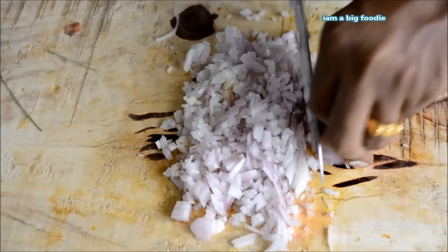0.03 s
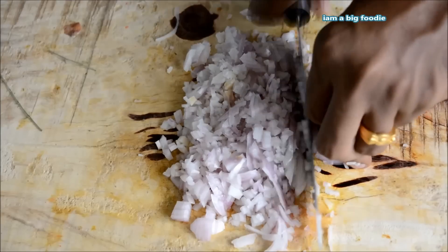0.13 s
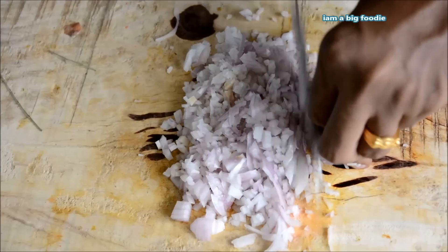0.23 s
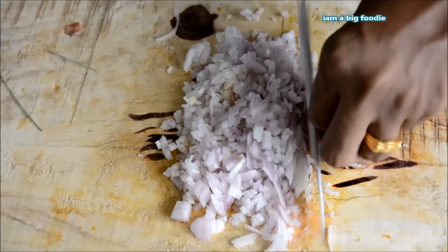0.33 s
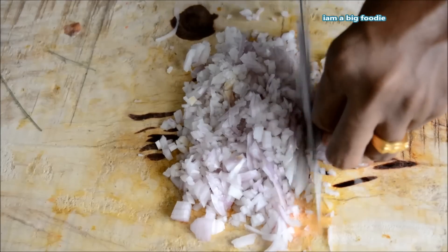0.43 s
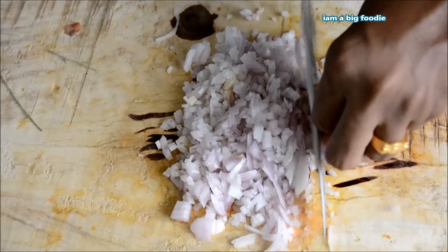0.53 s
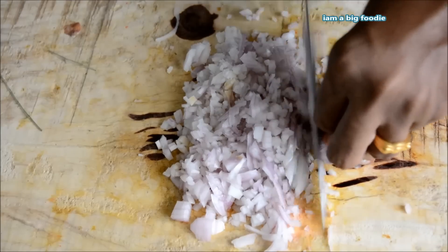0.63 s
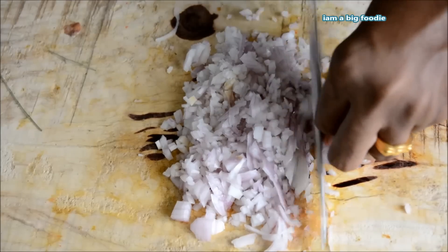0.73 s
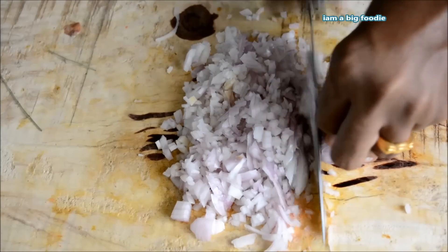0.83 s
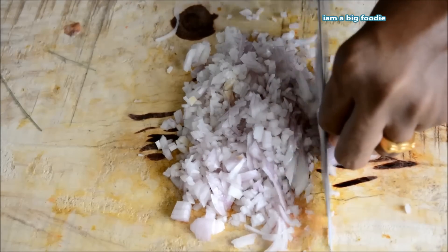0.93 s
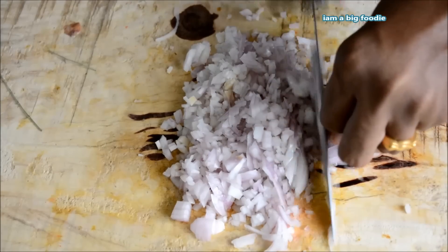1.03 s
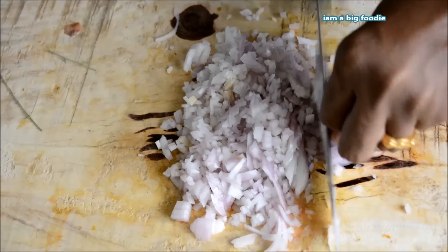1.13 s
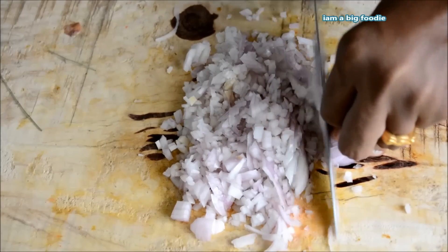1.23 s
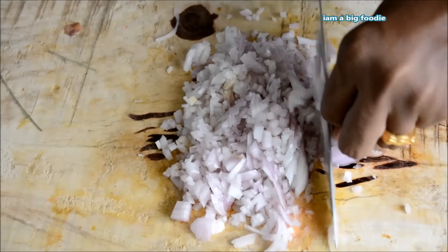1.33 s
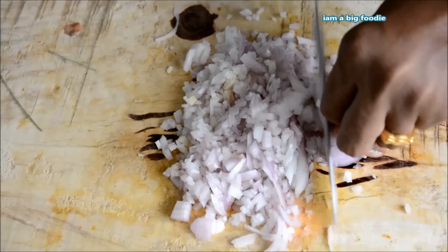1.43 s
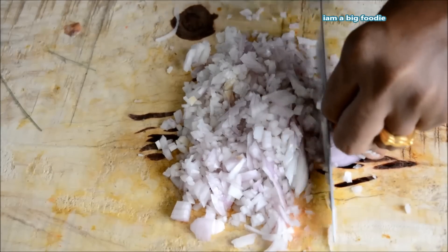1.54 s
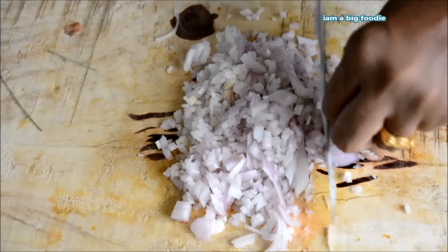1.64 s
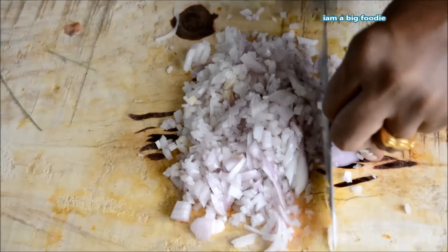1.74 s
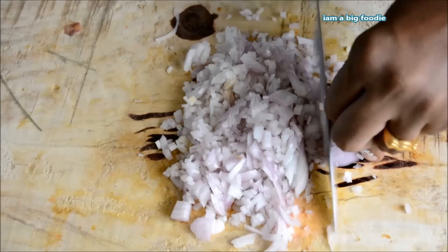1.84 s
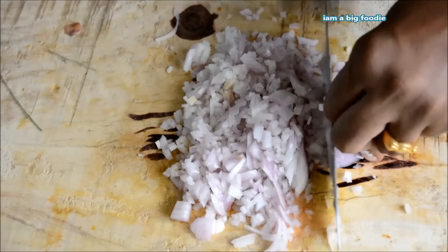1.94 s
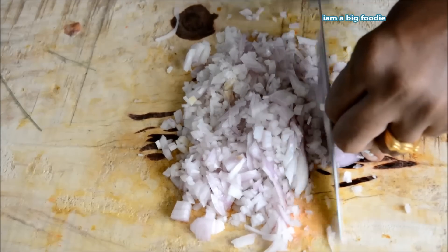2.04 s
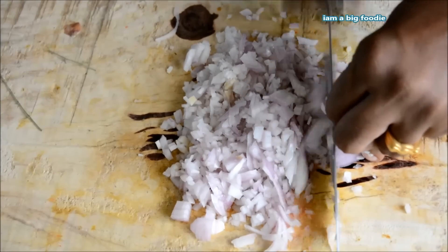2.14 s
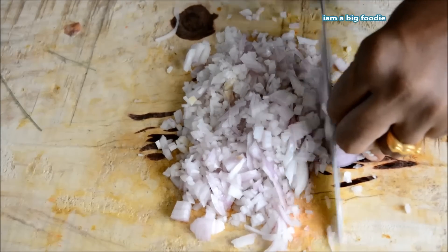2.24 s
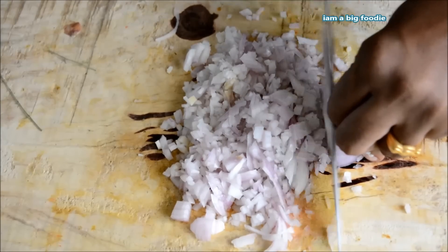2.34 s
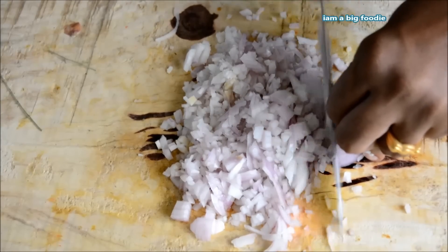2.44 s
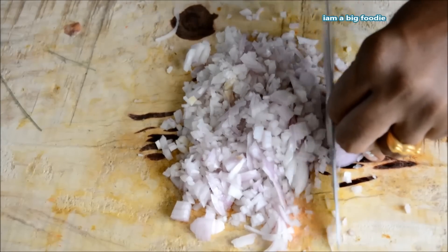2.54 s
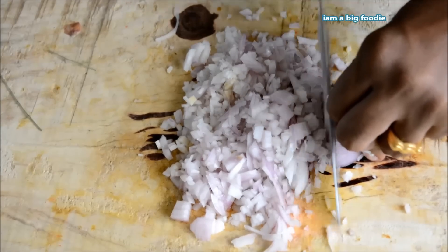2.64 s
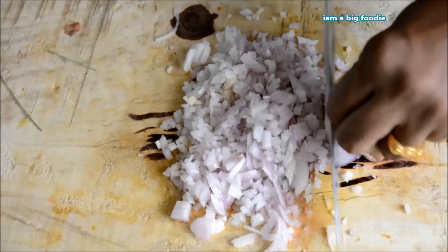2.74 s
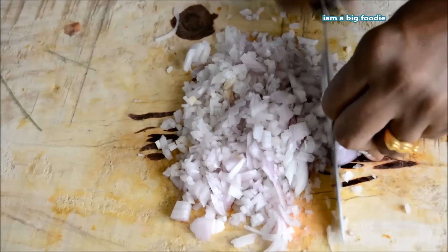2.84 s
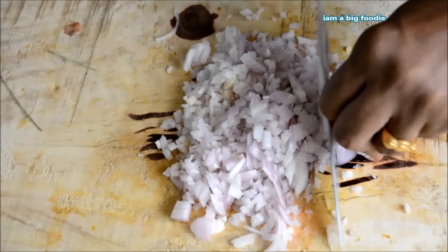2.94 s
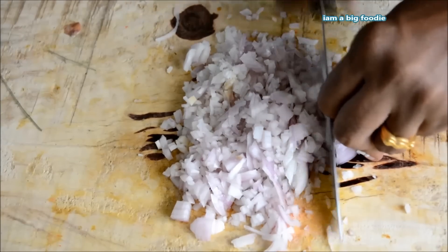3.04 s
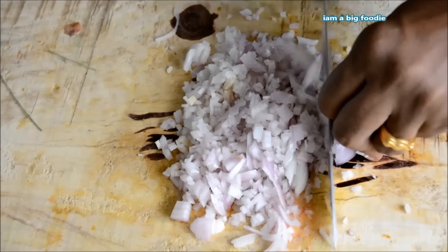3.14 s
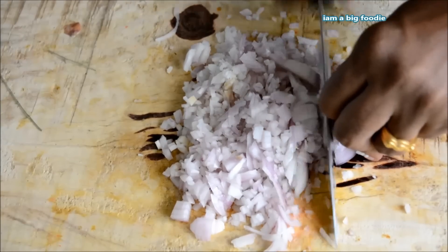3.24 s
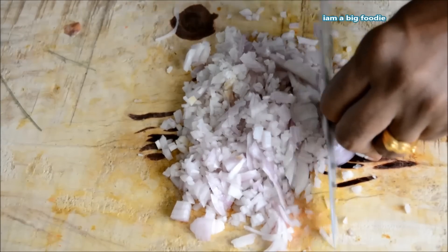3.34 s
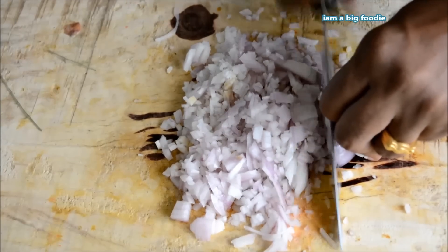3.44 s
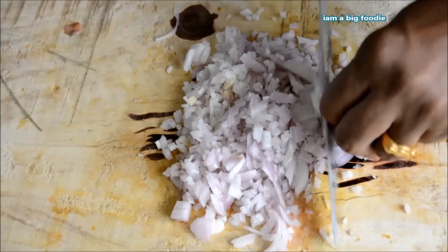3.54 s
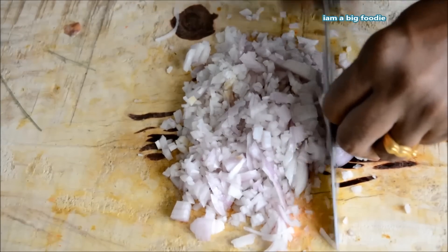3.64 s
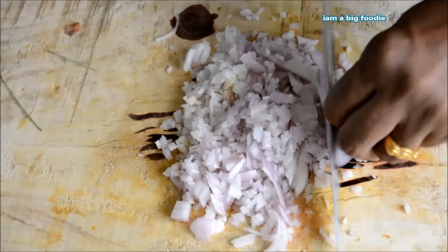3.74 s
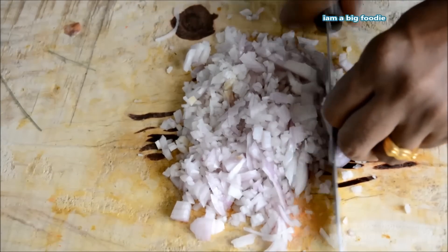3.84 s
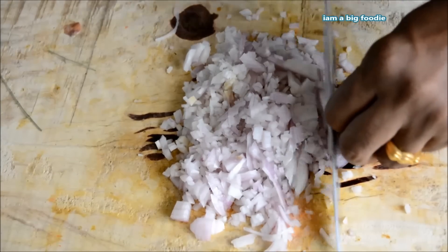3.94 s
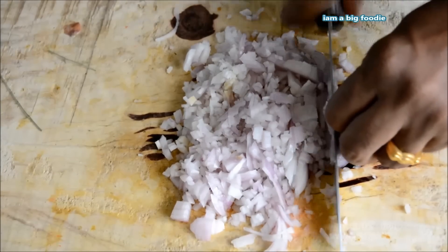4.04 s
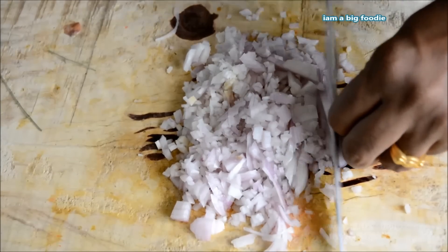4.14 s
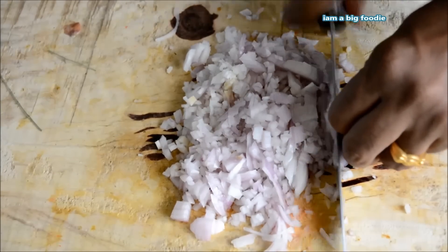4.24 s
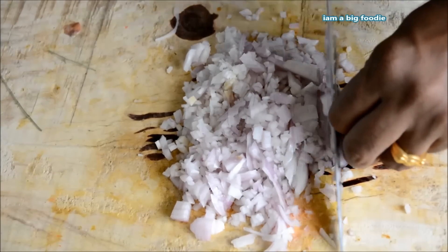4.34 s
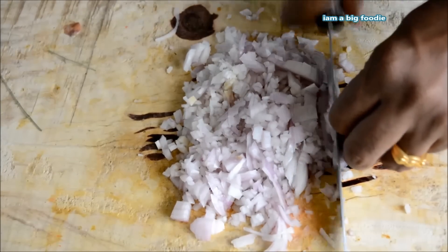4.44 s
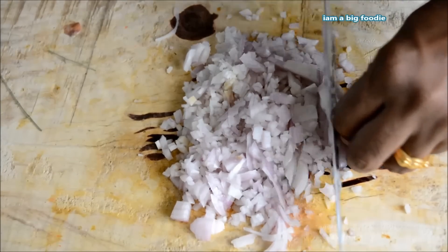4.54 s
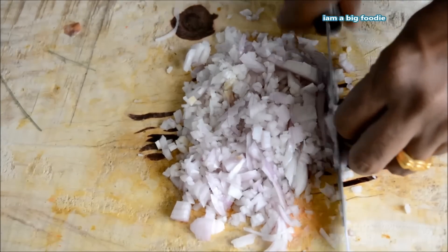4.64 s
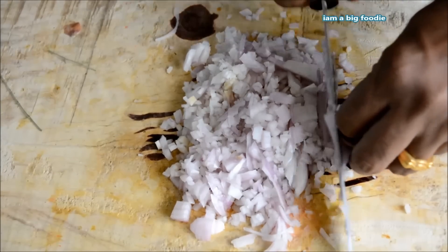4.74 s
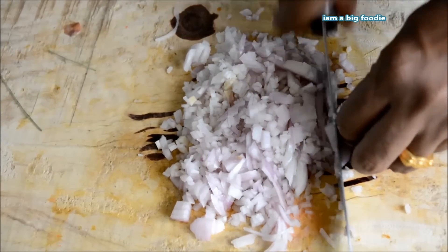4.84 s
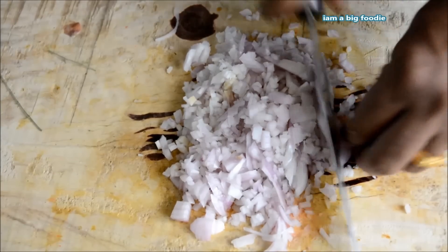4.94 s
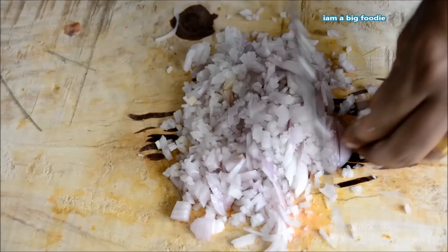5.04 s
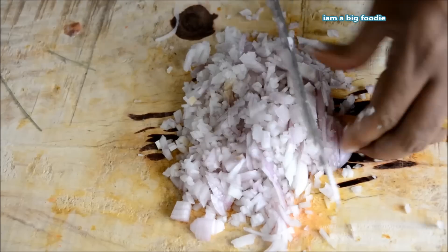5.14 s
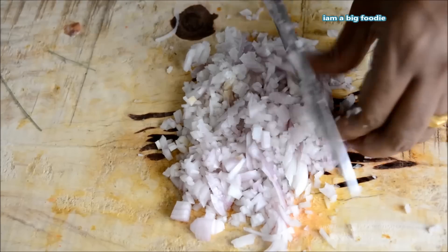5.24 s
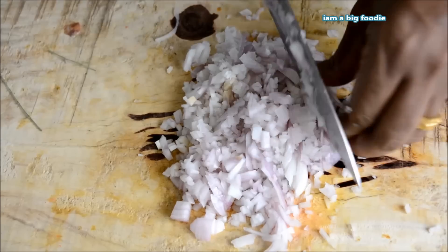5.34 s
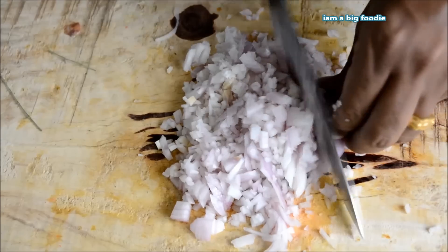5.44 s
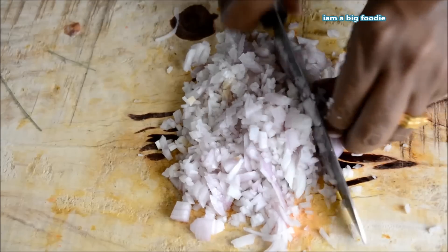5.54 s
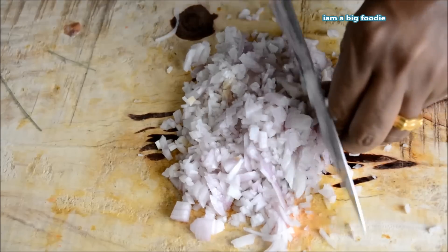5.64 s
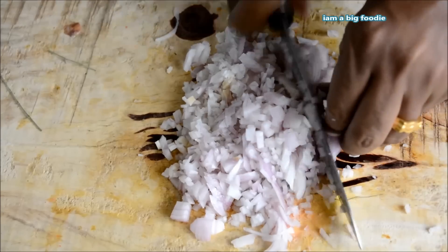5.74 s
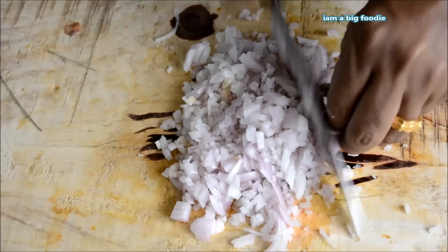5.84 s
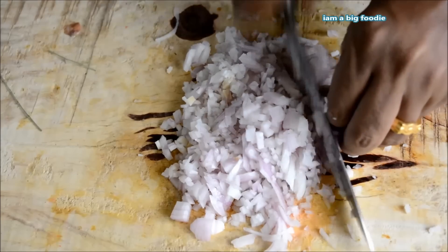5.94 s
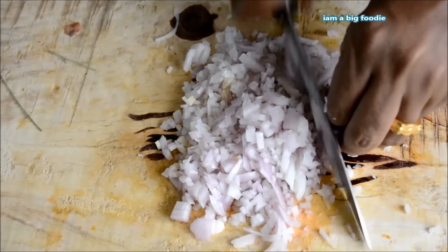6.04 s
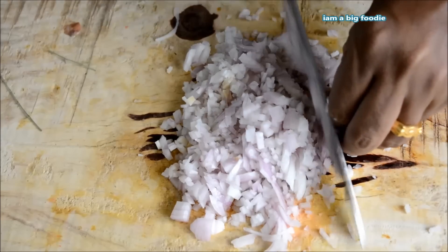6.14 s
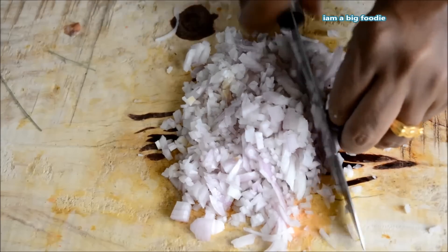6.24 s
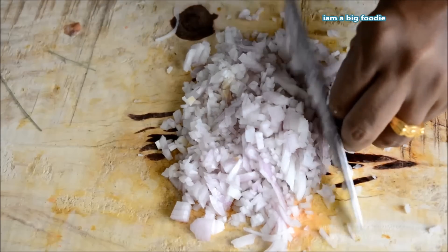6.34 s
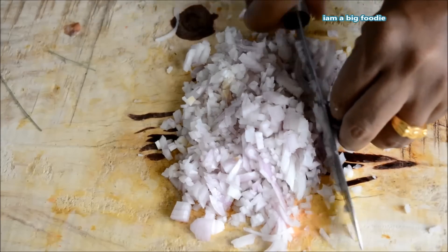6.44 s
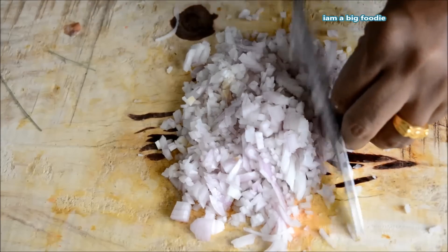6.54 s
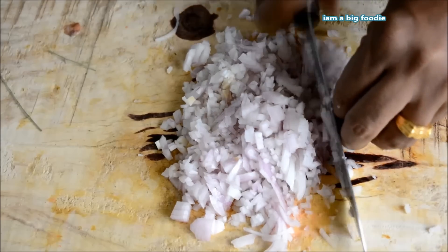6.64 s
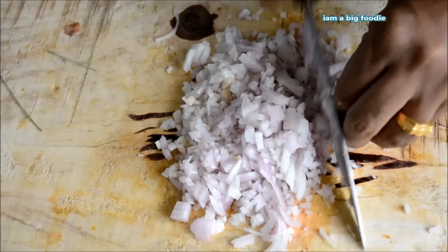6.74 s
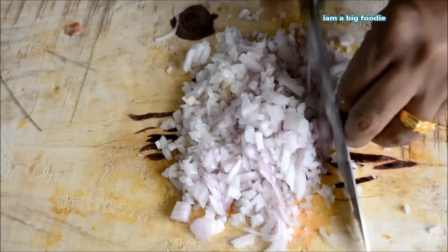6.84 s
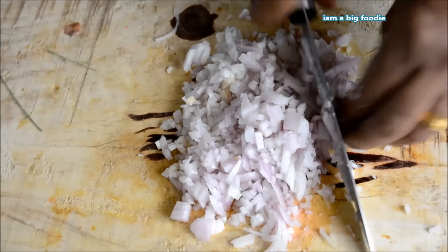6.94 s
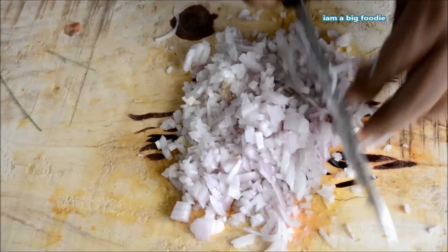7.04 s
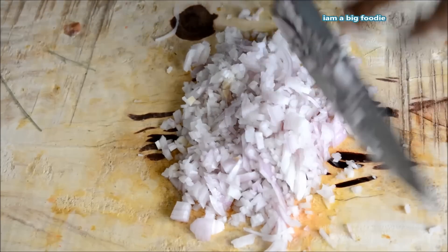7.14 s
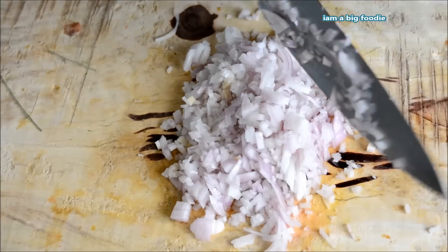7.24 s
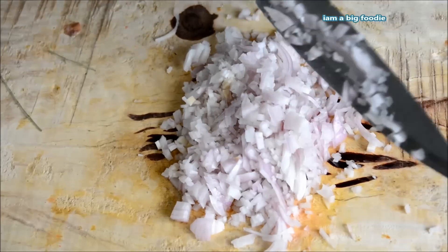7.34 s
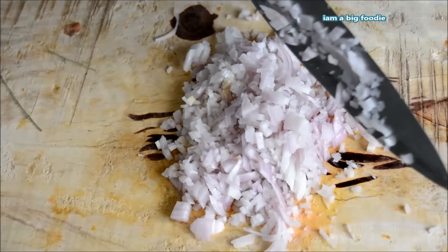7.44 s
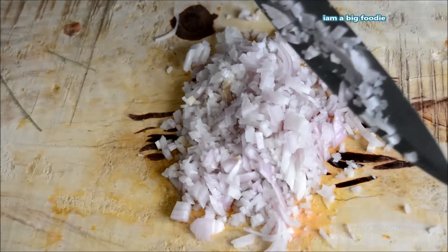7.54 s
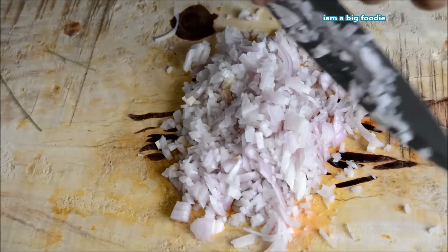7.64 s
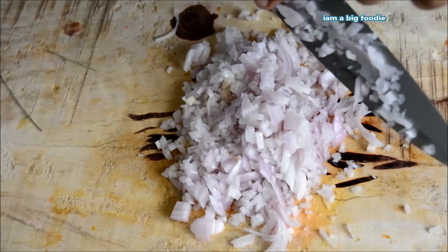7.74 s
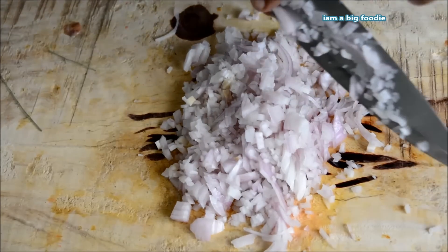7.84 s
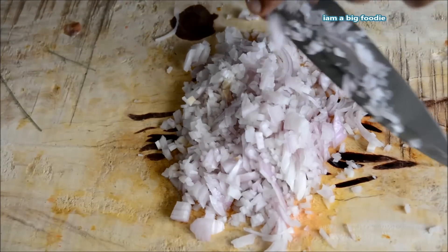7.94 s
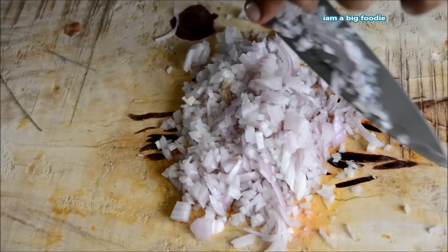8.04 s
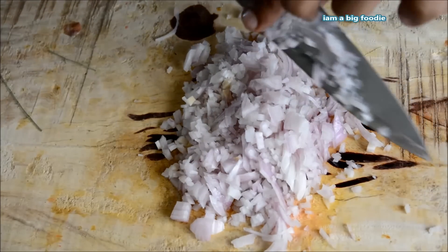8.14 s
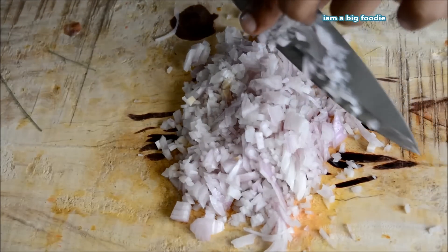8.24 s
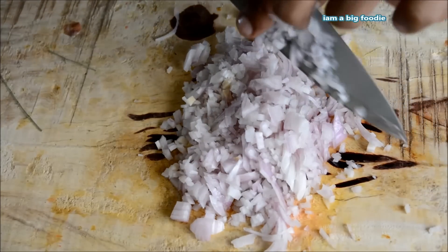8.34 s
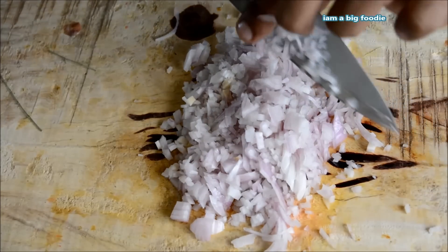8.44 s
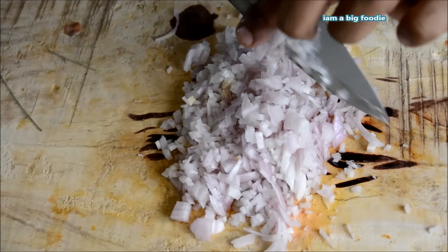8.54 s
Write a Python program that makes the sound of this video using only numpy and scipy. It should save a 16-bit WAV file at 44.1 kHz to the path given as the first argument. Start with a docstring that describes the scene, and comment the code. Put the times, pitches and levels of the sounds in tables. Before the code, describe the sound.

A large kitchen knife rapidly dices an onion on a wooden board, wet crunches and woody knocks in a long run, a pause, then a shorter run.

```python
"""A wet crunch and a woody knock come first: a large kitchen knife dices an onion on a board, close to the microphone.
About five strokes a second make a long run, a pause and a short run; then the knife is shifted quietly.
Crunch is a dense train of random cell bursts; each knock sums decaying modes of board and blade with noise.
Filtered noise shakes the table's low modes, a hard-walled kitchen echoes the knife,
and faint air noise, sine hums, a thin whine and a late rumble lie beneath."""
import sys
import numpy as np
from scipy import signal
from scipy.fft import rfft, irfft, next_fast_len
from scipy.io import wavfile

SR = 44100
rng = np.random.default_rng(int(sys.argv[2]) if len(sys.argv) > 2 else 0)


def output_pcm(signal):
    """Save a mono or channel-first signal as 16-bit PCM at the path in sys.argv[1].

    Samples are clipped to [-1, 1] before scaling.
    """
    pcm = np.clip(np.atleast_2d(signal).T, -1, 1) * 32767
    wavfile.write(sys.argv[1], SR, np.round(pcm).astype(np.int16))


N = 378364
TIME = np.arange(N) / SR

# Knife strokes; the last stops in the onion. The lead is how long before landing the edge enters the onion;
# wood and ring levels are relative to the knock, knock and crunch levels precede filtering:
# land_s, knock_db, hollow_wood_db, blade_ring_db, lead_s, crunch_db
STROKES = [(0.129, -20.5, -0.5, -3, 0.023, -59), (0.3848, -15, 3.5, 1, .038, -52.5),
           (0.602, -18, 4, 2.5, 0.038, -50.5), (0.7961, -15.5, 5, 5, 0.034, -49),
           (1.0019, -21.5, 14.5, -2, 0.053, -47), (1.204, -24, 12, 2, .053, -47.5),
           (1.3504, -17.5, -3, -1, 0.00067, -60.5), (1.5505, -13, -2, -2, 0.002, -70.5),
           (1.7632, -9, 0, 0.5, 0.039, -54), (1.9815, -14, 3.5, -2, 0.041, -50.5),
           (2.1927, -17, 4, -3.5, 0.049, -49.5), (2.373, -9, -1.5, -5, 0.036, -54),
           (2.5734, -9.5, -2, -7.5, .028, -55), (2.8022, -12.5, 2.5, 2.5, 0.042, -47),
           (3.0012, -12.5, -3, -0.5, .032, -54.5), (3.1875, -9.5, -1, -1.5, 0.044, -64.5),
           (3.4121, -13.5, 2, 7, 0.046, -47.5), (3.611, -11.5, 0, 3, 0.049, -55),
           (3.8104, -18.5, 1.5, 3.5, 0.033, -47.5), (4.0103, -18, -1, 6, 0.03, -50.5),
           (4.22, -15, 0.5, 5.5, .033, -51.5), (4.4216, -16.5, -2, 1.5, .028, -50.5),
           (4.6265, -11.5, -1, 5.5, 0.0075, -50), (4.8089, -20, -1, 9.5, 0.0017, -50.5),
           (5.4864, -17, -0.5, -2.5, 0.03, -56), (5.7435, -19.5, 0.5, 0, 0.03, -53.5),
           (5.966, -16, -1, 3.5, 0.018, -49), (6.2096, -22.5, 3, 4, 0.02, -49.5),
           (6.4221, -22.5, 2, 3, 0.0057, -52), (6.6486, -17, -3, -1, 0.0013, -48),
           (6.889, -54, -7, 0, .044, -53)]
# Snaps of firm onion layers, before filtering: start_s, level_db
LAYER_SNAPS = [(0.182, -37.5), (0.405, -26.5), (0.51, -50.5), (0.984, -37), (3.816, -35.5), (5.742, -25.5),
               (5.963, -31.5)]
# Light touches while the knife is shifted: start_s, level_db
LIGHT_TOUCHES = [(7.385, -81), (7.425, -79), (7.945, -82), (8.40, -77)]

# Modes of the wooden board: pitch_hz, level_db, t60_s
BOARD_MODES = [(626.6, -16, 0.03), (830, -3.5, 0.027), (1052, -6, 0.034), (1156.3, -5.5, 0.05),
               (1227.4, -15.5, 0.18), (1275, -8.5, 0.1), (1403, 6, 0.052), (1402, -17, 0.06),
               (1487, -16.5, 0.12), (1662, -4, 0.05), (1753, -10, 0.1), (1890, 6.5, 0.0051),
               (2012, -17.5, 0.22), (2137, -15, 0.011)]
# Modes of the steel blade: pitch_hz, level_db, t60_s
BLADE_MODES = [(2619, -8.5, 0.043), (3020, -5.5, 0.011), (3540, -18, 0.015), (4450, -18, 0.014),
               (4998, -29.5, 0.019), (6160, -38, .04)]
# Low modes of the table: pitch_hz, level_db, t60_s
TABLE_MODES = [(57.7, -27.5, .1), (105.5, -5.5, 0.56), (125, -5.5, 0.16), (276.1, -4, 0.071),
               (405.3, -3.5, 0.082)]

# Spectrum of the edge's noise on the board: frequency_hz, gain_db
CRACK_SPECTRUM = [(100, -12), (400, 9), (1500, 15), (3200, 10.5), (5000, -6), (10000, -17), (15000, -30.5)]
# Spectrum of the crunching onion: frequency_hz, gain_db
CRUNCH_SPECTRUM = [(200, -13.5), (500, 2.5), (1000, 12), (3000, 2), (5000, -4), (8000, -2), (10800, -2.5),
                   (13000, -9.5), (15500, -17)]
# Radiation of the board, too small to radiate bass: frequency_hz, gain_db
BOARD_RADIATION = [(40, -20.5), (200, -15), (450, -7.5), (650, 1)]

# Spectrum of the diffuse kitchen tail: frequency_hz, gain_db
KITCHEN_SPECTRUM = [(60, 1.5), (150, 7), (320, 13.5), (550, 1), (850, -5), (1400, -7.5), (2000, -0.5),
                    (3000, -4), (5000, -2.5), (9000, -6.5), (15000, -8.5)]
# Reverberation time of the kitchen: frequency_hz, t60_s
KITCHEN_T60 = [(100, 1), (250, 0.56), (600, 0.64), (1500, 0.53), (4000, 0.5), (10000, 0.49)]
# Reflections from near walls, before their filter: delay_s, level_db
WALL_ECHOES = [(.0115, -17), (.0238, -12), (.0495, -20)]
# Clutter along the walls scatters treble out of their echoes: frequency_hz, gain_db
ECHO_TONE = [(1500, -1), (3000, -17), (10000, -17.5)]

# The two microphone ports sit close together, so they differ mainly in the treble.
# Side part of the direct sound: frequency_hz, gain_db
DIRECT_SIDE = [(300, -38), (1400, -25), (3000, -18.5), (5500, -19), (10000, -13)]
# Side part of the diffuse tail: frequency_hz, gain_db
ROOM_SIDE = [(350, -35), (1300, -21), (3500, -14), (9000, -17)]
# Side part of the air noise: frequency_hz, gain_db
AIR_SIDE = [(150, -15.5), (400, -12.5), (1300, -9.5), (4400, -3), (10000, 0)]
# Response of the microphone: frequency_hz, gain_db
MICROPHONE_RESPONSE = [(20, -19), (60, 2), (11000, -2), (13000, -6.5), (15500, -13.5)]

# Spectrum of the quiet air: frequency_hz, gain_db
AIR_SPECTRUM = [(25, -14.5), (55, -12), (85, -15), (115, -8.5), (170, 1), (250, -4.5), (520, -2), (750, -4),
                (1400, -3.5), (2300, -11.5), (4000, -16.5), (7000, -24.5), (11000, -26), (16000, -33)]
# Thin steady whine, before the common factor of root two: pitch_hz, level_db
WHINE_TONES = [(4904, -99), (6422, -94), (8926, -104)]
# Faint distant hums, before the same factor: start_s, length_s, pitch_hz, level_db
DISTANT_HUMS = [(-.05, .17, 550, -71), (7.278, .38, 350.5, -73), (8.416, .25, 346, -78)]

HUM_FADE_S = 0.039
AIR_DB = -68  # rms of the mid part
# a low rumble outside sets in near the end
RUMBLE_START_S, RUMBLE_RISE_S, RUMBLE_DB = 8.15, 0.17, -75
ROOM_BUILD_S = .012

# the spot that is struck favours some modes: standard deviation of their level in dB
SPOT_DB = .7
# standard deviation of the mode shift per stroke, as a share of pitch; the fingers load the blade differently
BOARD_DETUNE, BLADE_DETUNE, TABLE_DETUNE = .004, .008, .02
# harder strokes are brighter and shake the table more; hollow ones are duller
USUAL_DB = -16
HARDNESS_DB, HARDNESS_PER_DB, HOLLOW_DULLING = -3, 0.6453, 0.29
BOOM_DB, BOOM_PER_DB = -63.5, 1.3  # level before halving; dB per dB of knock

# shortest time the edge takes through the onion, and the decay of the crackle after it
CUT_S, CUT_RELEASE_T60_S = .042, 0.073
# the edge meets layers one after another: rate, and standard deviation of their loudness in dB
LAYERS_PER_S, LAYER_DB = 200, 2
# mean of the exponentially distributed extra level of single cells
CELL_SPREAD_DB = 2.2
TOP_HZ = 15600


def undb(db):
    """Logarithmic level: convert decibels to an amplitude ratio."""
    return 10 ** (np.asarray(db) / 20)


def unit(x):
    """Normalisation: scale a signal to rms 1."""
    return x / np.sqrt(np.mean(x ** 2) + 1e-20)


def span(seconds):
    """Sampling: the time axis of a short sound."""
    return np.arange(int(seconds * SR)) / SR


def fade(t, t60):
    """Exponential damping: amplitude falls 60 dB in t60 seconds."""
    return np.exp(-np.log(1000) * t / t60)


def ramp(t, seconds):
    """Linear onset: rise from 0 to 1 over the given time, then hold."""
    return np.clip(t / seconds, 0, 1)


def along(points, hz):
    """Logarithmic frequency: interpolate (Hz, value) points on a log axis."""
    point_hz, value = np.transpose(points)
    return np.interp(np.log(np.maximum(hz, 1)), np.log(point_hz), value)


def colour(x, points):
    """Minimum-phase filtering: a folded cepstrum gives a causal filter with the gain of (Hz, dB) points."""
    n = 2 * next_fast_len(len(x))
    gain = undb(along(points, np.fft.rfftfreq(n, 1 / SR)))
    cepstrum = irfft(np.log(gain))
    cepstrum[1:n // 2] *= 2
    cepstrum[n // 2 + 1:] = 0
    response = np.exp(rfft(cepstrum))
    return irfft(rfft(x, n) * response)[:len(x)]


def add(track, s, sound):
    """Superposition: mix a sound into a track at time s."""
    i = max(int(round(s * SR)), 0)
    track[i:i + len(sound)] += sound[:max(N - i, 0)]


def ring(modes, t, detune):
    """Modal vibration: damped sines of alternating sign, so the knock takes a millisecond to build."""
    total = np.zeros(len(t))
    for k, (hz, db, t60) in enumerate(modes):
        spot, shift = rng.standard_normal(2)
        amplitude = (-1) ** k * undb(db + SPOT_DB * spot)
        total += amplitude * np.sin(2 * np.pi * hz * (1 + detune * shift) * t) * fade(t, t60)
    return total


def quiet_air():
    """Ambient noise: independent mid and side parts of filtered noise form the quiet air of the house."""
    mid, side = (unit(colour(rng.standard_normal(N), AIR_SPECTRUM)) for _ in range(2))
    side = colour(side, AIR_SIDE)
    return undb(AIR_DB) * np.array([mid + side, mid - side])


def outside_rumble(hz=170):
    """Band-limited noise: a low rumble peaks at hz and rises to a steady level."""
    band = [(hz / 2, -40), (hz, 0), (hz * 2, -40), (hz * 10, -80)]
    noise = unit(colour(rng.standard_normal(N), band))
    return undb(RUMBLE_DB) * ramp(TIME - RUMBLE_START_S, RUMBLE_RISE_S) * noise


def hums_and_whine():
    """Pure tones: faint hums come and go over a thin steady whine."""
    total = np.zeros(N)
    for s, length, hz, db in DISTANT_HUMS:
        swell = ramp(TIME - s, HUM_FADE_S) * ramp(s + length - TIME, HUM_FADE_S)
        total += undb(db) * swell * np.sin(2 * np.pi * hz * TIME)
    for hz, db in WHINE_TONES:
        total += undb(db) * np.sin(2 * np.pi * hz * TIME)
    return np.sqrt(2) * total


def background():
    """Superposition of the quiet sounds: air, rumble, hums and whine."""
    return quiet_air() + outside_rumble() + hums_and_whine()


def room_response(wet_db=-3.5):
    """Reverberation: direct sound, near walls and a diffuse tail damped by frequency, as mid and side."""
    t = span(.55)
    centres = 62.5 * 2. ** np.arange(9)  # octave bands, Hz
    hz = np.fft.rfftfreq(len(t), 1 / SR)
    noise = rfft(rng.standard_normal((2, len(t))))
    tail = np.zeros((2, len(t)))
    for centre, weights in zip(centres, np.eye(len(centres))):
        band = irfft(noise * along(np.c_[centres, weights], hz), len(t))
        tail += band * fade(t, along(KITCHEN_T60, centre))
    tail *= 1 - np.exp(-(t / ROOM_BUILD_S) ** 2)
    mid, side = (undb(wet_db) * colour(row, KITCHEN_SPECTRUM) / np.linalg.norm(row) for row in tail)
    mid[0] += 1  # direct sound
    walls = np.zeros(len(t))
    for s, db in WALL_ECHOES:
        walls[int(s * SR)] = undb(db)
    # hands and board scatter the direct sound a little differently to each port
    scatter = rng.standard_normal(len(t)) * fade(t, .01)
    direct_side = colour(scatter / np.linalg.norm(scatter), DIRECT_SIDE)
    return np.array([mid + colour(walls, ECHO_TONE), colour(side, ROOM_SIDE) + direct_side])


def kitchen(x, count=5):
    """Path variation: knife and hands keep moving, so each stroke takes one of several room responses."""
    lifts = [row[0] - .065 for row in STROKES]  # the path changes 65 ms before landing
    stroke = np.searchsorted(lifts, TIME)
    path = rng.integers(count, size=len(STROKES) + 1)[stroke]
    heard = np.zeros((2, N))
    for k in range(count):
        heard += signal.oaconvolve([x * (path == k)], room_response(), axes=1)[:, :N]
    mid, side = heard
    return np.array([mid + side, mid - side])


def booms(swell_s=0.015):
    """Forced vibration: the table takes up each blow slowly and shudders in its low modes."""
    out, t = np.zeros(N), span(.35)
    swell = (t / swell_s) ** 2 * np.exp(-t / swell_s)
    for s, db, *_ in STROKES:
        push = swell * rng.standard_normal(len(t))
        boom = signal.fftconvolve(push, ring(TABLE_MODES, t, TABLE_DETUNE))[:len(t)]
        add(out, s, undb(BOOM_DB + BOOM_PER_DB * (db - USUAL_DB)) * unit(boom) / 2)
    return out


def touches(t60=0.2, wet_db=-3):
    """Friction: the blade brushes pile and board, fading noise that also excites the board's modes."""
    out, t = np.zeros(N), span(.15)
    for s, db in LIGHT_TOUCHES:
        rub = rng.standard_normal(len(t)) * fade(t, t60)
        wood = signal.fftconvolve(rub, ring(BOARD_MODES, t, detune=0.02))[:len(t)]
        wet = undb(wet_db) * unit(colour(rub, CRACK_SPECTRUM))
        add(out, s, undb(db) * (unit(wood) + wet))
    return out


def onion(cells_per_s=16000, entry=0.11, snap_t60=0.0072, trim_db=6):
    """Fracture: cells burst in a crackle that grows as the edge sinks in, then dies; some layers snap."""
    out, t = np.zeros(N), span(.15)
    for s, *_, lead, db in STROKES:
        length = max(lead, CUT_S)
        bursts = rng.random(len(t)) < cells_per_s / SR
        sizes = undb(CELL_SPREAD_DB * rng.exponential(size=len(t)))
        layer_levels = rng.standard_normal(len(t))
        layers = undb(LAYER_DB * np.interp(t * LAYERS_PER_S, np.arange(len(t)), layer_levels))
        cells = unit(bursts * sizes * layers * rng.standard_normal(len(t)))
        sinking = entry + (1 - entry) * ramp(t, length)
        pressure = sinking * fade(np.maximum(t - length, 0), CUT_RELEASE_T60_S)
        add(out, s - lead, undb(db + trim_db) * pressure * cells)
    for s, db in LAYER_SNAPS:
        add(out, s, undb(db) * rng.standard_normal(len(t)) * fade(t, snap_t60))
    return colour(out, CRUNCH_SPECTRUM)


def knocks(crack_db=-12, crack_t60=0.088, tick_db=-11, tick_t60=0.016):
    """Impact: the landing edge excites board and blade modes; contact force shapes the spectrum."""
    out, t = np.zeros(N), span(.15)
    for s, db, wood_db, blade_db, _, _ in STROKES:
        body = ring(BOARD_MODES, t, BOARD_DETUNE) - undb(blade_db) * ring(BLADE_MODES, t, BLADE_DETUNE)
        # steel ticks on the surface, then bites into the fibres
        bite = undb(tick_db) * fade(t, tick_t60) + undb(crack_db) * fade(t, crack_t60)
        crack = unit(colour(rng.standard_normal(len(t)), CRACK_SPECTRUM)) * bite
        # the spot that is struck sets the hollow tone; a stronger blow has a shorter, brighter contact
        hardness = HARDNESS_DB + HARDNESS_PER_DB * (db - USUAL_DB) - HOLLOW_DULLING * wood_db
        contact = [(400, 0.0077), (680, wood_db), (950, wood_db),
                   (1500, 0), (3000, hardness), (6400, 1.7 * hardness)]
        knock = colour(body + crack, contact)
        attack_rms = np.sqrt(np.mean(knock[t < .009] ** 2))
        add(out, s, undb(db) * knock / attack_rms)
    return colour(out, BOARD_RADIATION)


def scene():
    """Superposition: knife, onion and board through the kitchen, over table booms and background."""
    knife = knocks() + onion() + touches()
    return background() + booms() + kitchen(knife)


def record(dry):
    """Transduction: peaks that overload the recorder clip; the spectrum's extremes roll off, the top is cut."""
    clipped = np.clip(dry, -.97, .97)
    coloured = np.array([colour(channel, MICROPHONE_RESPONSE) for channel in clipped])
    low_pass = signal.ellip(8, .2, 70, TOP_HZ, fs=SR, output="sos")
    return signal.sosfilt(low_pass, coloured)


dry = scene()
out = record(dry)
output_pcm(out)
```